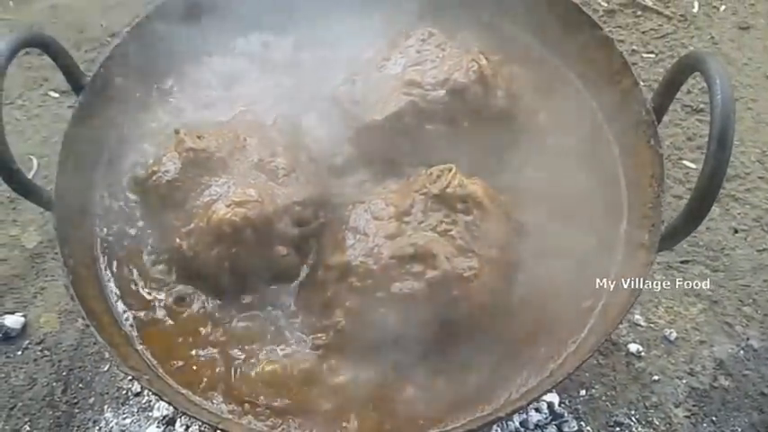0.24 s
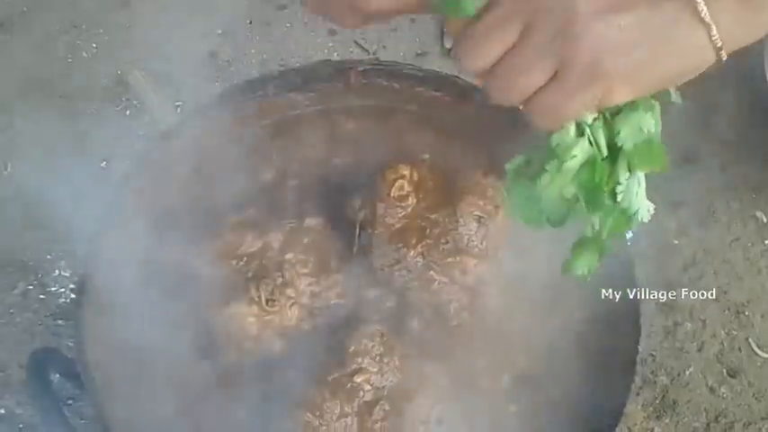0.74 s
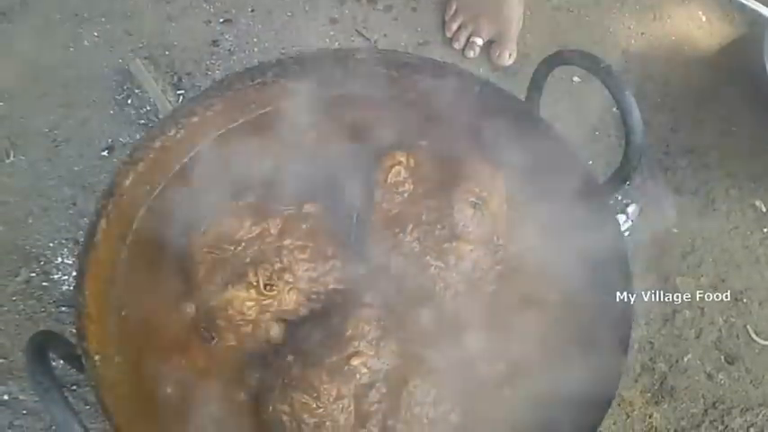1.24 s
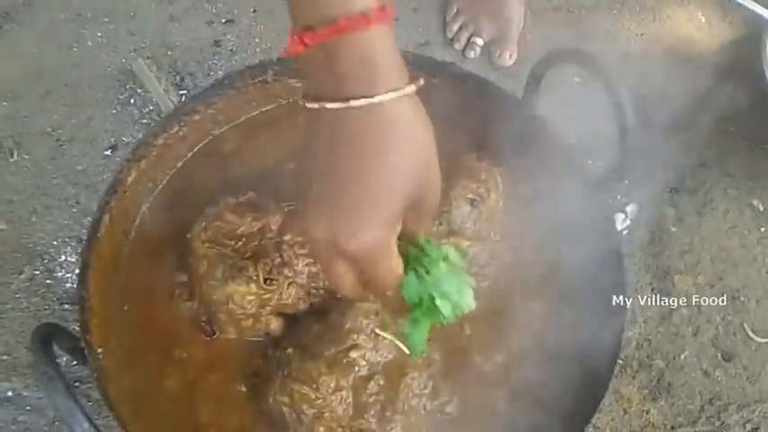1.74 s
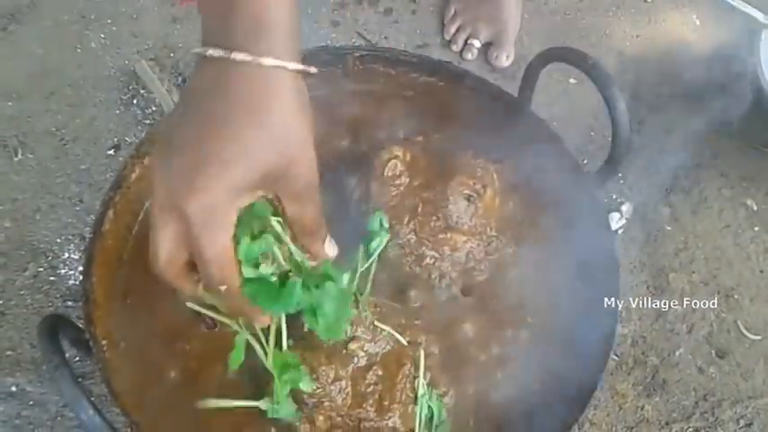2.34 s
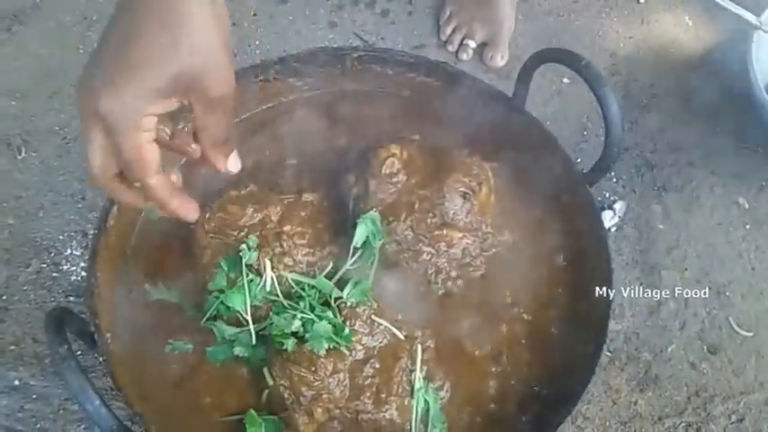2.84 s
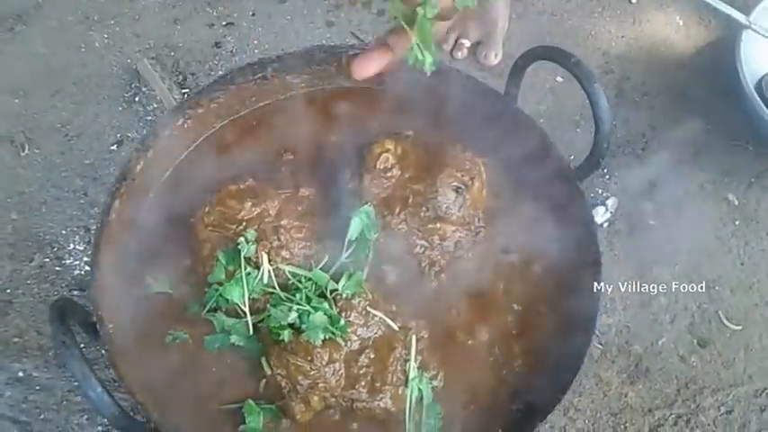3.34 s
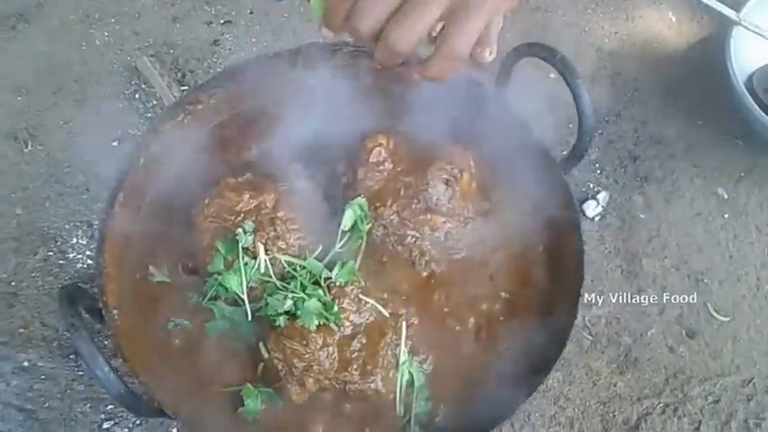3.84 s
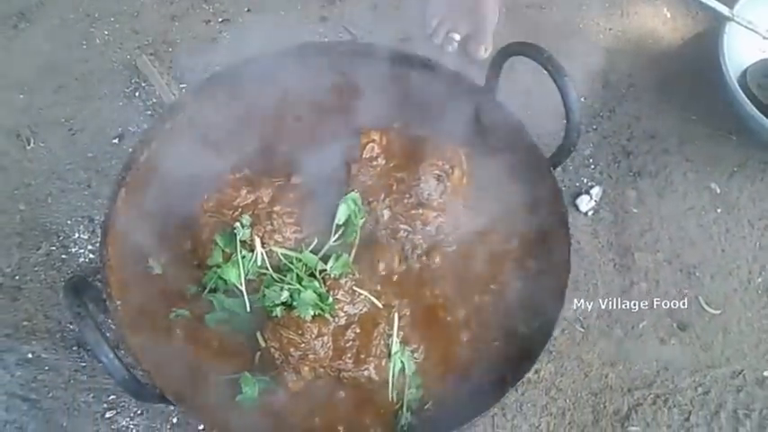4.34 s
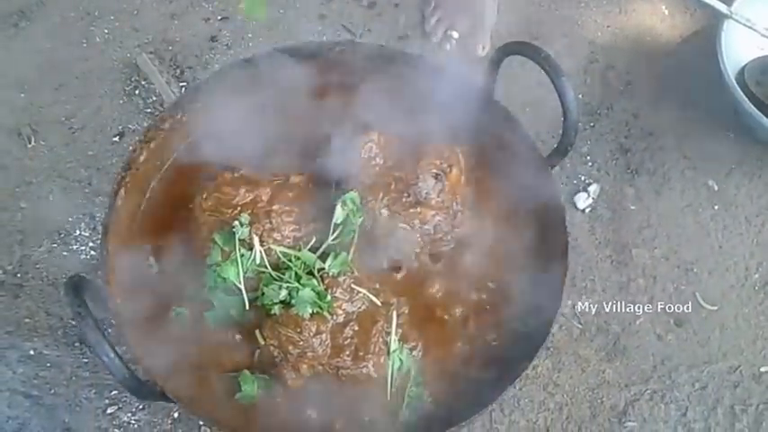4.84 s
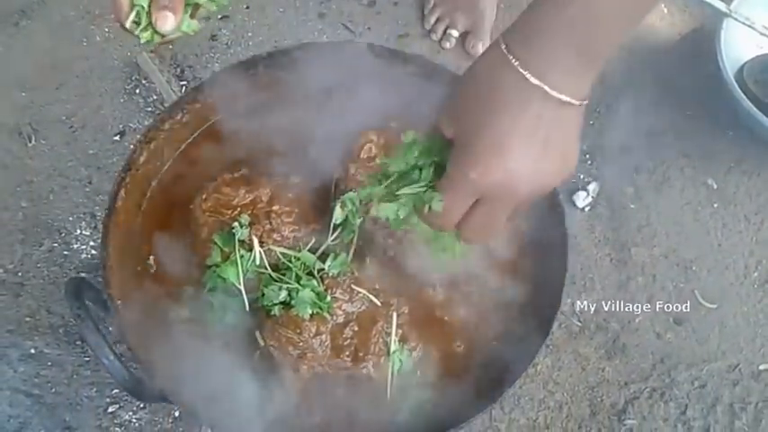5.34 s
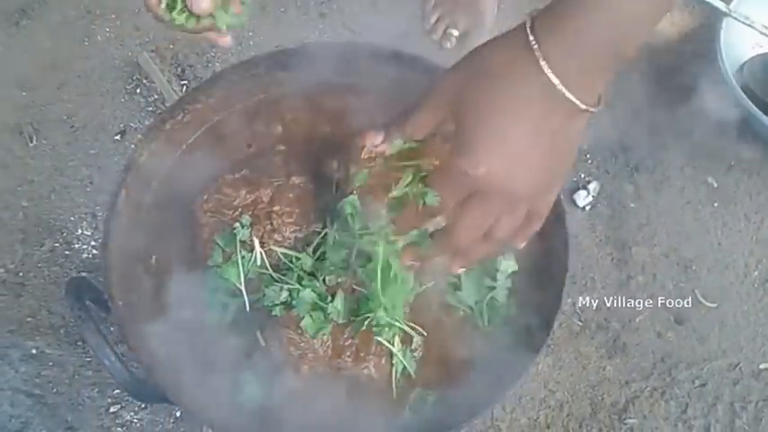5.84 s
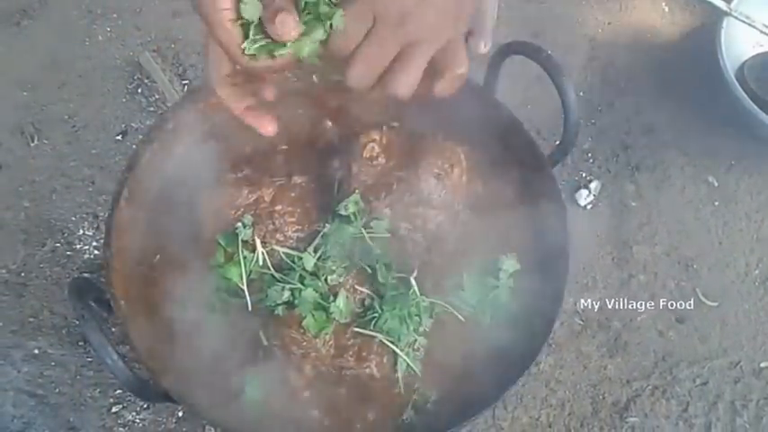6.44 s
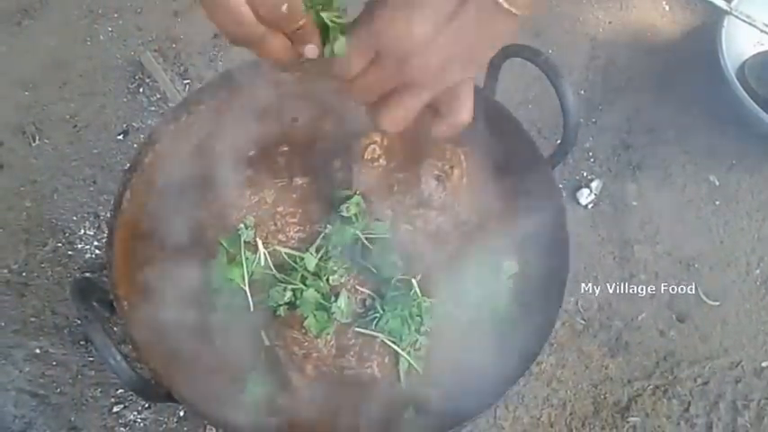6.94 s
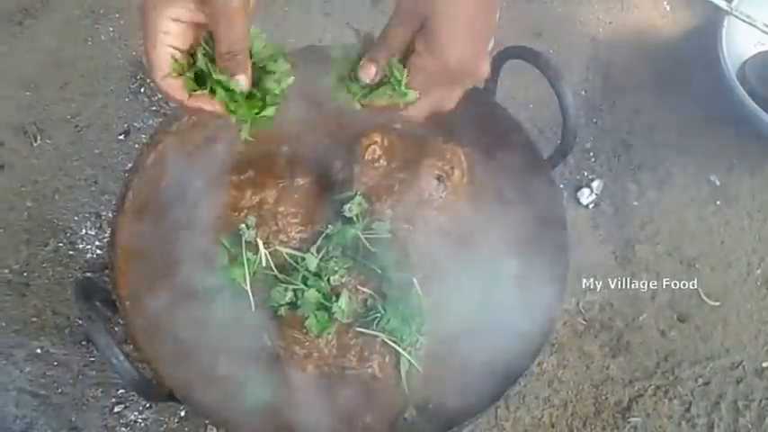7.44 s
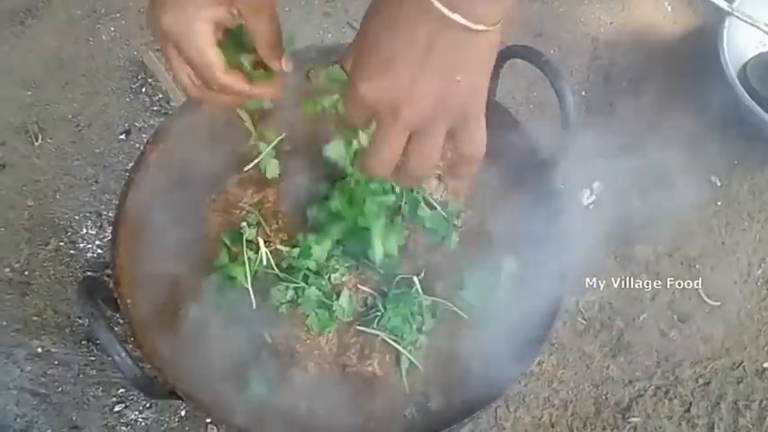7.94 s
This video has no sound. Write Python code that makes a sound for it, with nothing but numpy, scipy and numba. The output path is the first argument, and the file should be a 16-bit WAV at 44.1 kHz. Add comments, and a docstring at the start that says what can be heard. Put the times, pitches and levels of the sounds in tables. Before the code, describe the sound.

Thick gravy boils in a wide metal pan over an outdoor fire, bubbling and spitting with a few louder pops at the start. About a second in, hands tear fresh herbs, with crisp stem snaps and leafy rustling. The tearing returns midway and once more near the end as the boil carries on. The microphone is just above the pan, with a faint fire rumble behind.

```python
"""Thick gravy boils in a wide metal pan over an outdoor fire; a phone is held just above it.
From the start the fire rumbles, an insect hisses in a narrow band, and steam pockets burst as rising
blips and spit fine drops. The boil sizzles, one pocket gurgles, a few thump; then hands tear herbs:
stems snap, leaves rustle. They tear again near 4.7 s, a far bird whistles once at 5.2 s, and a last
pull comes at 7.2 s."""
import sys
import numpy as np
from scipy import signal
from scipy.fft import rfft, irfft
from scipy.io import wavfile
from scipy.ndimage import uniform_filter1d
from numba import njit

SR = 44100
rng = np.random.default_rng(int(sys.argv[2]) if len(sys.argv) > 2 else 0)


def store_wav(level_fs):
    """Save 16-bit WAV to argv[1]."""
    pcm = np.round(np.clip(np.atleast_2d(level_fs), -1, 1) * 32767)
    wavfile.write(sys.argv[1], SR, pcm.T.astype(np.int16))


N = 361158

# background around the pan: (time [s], rumble level [dB], open-air hiss level [dB])
BACKGROUND = [(0.0, -55, -67), (1.07, -56, -63.5), (1.5, -61, -79), (8.19, -65, -75.5)]
# spectra of the rumble, of air and steam, and of rustling: (frequency [Hz], relative density [dB])
RUMBLE_SPECTRUM = [(20, -25), (50, -14), (110, -4.5), (220, -3.5), (420, -7), (1000, -7.5), (2400, -13),
                   (3000, -21)]
HISS_SPECTRUM = [(1500, -36), (3000, 2.5), (4400, 9), (5700, -3.5), (9000, 4), (16000, -8.5)]
RUSTLE_SPECTRUM = [(200, -6), (700, -7.5), (1800, 2.5), (3300, -4.5), (4300, 1), (6000, -2), (9200, 4.5),
                   (14200, 1.5), (16000, -26)]
# bursts of rustling hiss: the boil sizzling at the start, then pulls on the herbs
# (time [s], hold [s], level [dB], gain below 6 kHz [dB])
RUSTLES = [(0.058, 0.22, -59, 12), (.38, 0.051, -60.5, 18.5), (0.602, 0.062, -48, -5.5),
           (0.698, 0.075, -48.5, -4.5), (0.784, 0.08, -46.5, -0.5), (0.885, 0.1, -49, -4),
           (1.058, 0.0068, -43.5, -1), (1.105, 0.011, -43, -18), (1.156, 0.077, -46, -9),
           (3.165, 0.25, -63, 5.5), (4.675, 0.04, -42.5, -4.5), (4.761, 0.075, -48.5, -5.5),
           (5.882, 0.064, -56.5, 6.5), (7.209, 0.056, -50, 4)]
# stems snapping and drops spitting: (time [s], level [dB], pitch [Hz])
CLICKS = [(0.118, -31, 5360), (0.1597, -36, 9200), (0.1902, -33, 8200), (0.293, -36, 13100),
          (0.3034, -34, 4130), (0.4088, -32, 4300), (0.446, -33.5, 8000), (0.604, -25.5, 7800),
          (0.66, -23.5, 9500), (0.697, -22, 7840), (0.71, -28, 9600), (0.723, -24, 7700),
          (0.7477, -29, 6400), (0.784, -27.5, 4120), (0.7932, -29, 4270), (0.801, -25, 4540),
          (0.8188, -22, 7460), (0.8344, -21, 9700), (0.844, -25.5, 9800), (0.849, -24, 9900),
          (.8651, -29, 8600), (.9033, -34.5, 4100), (0.9311, -24, 10800), (0.9585, -23, 12400),
          (1.0046, -33, 8300), (1.0543, -24, 12400), (1.0598, -10.5, 13500), (1.0694, -23, 13500),
          (1.0816, -33, 13500), (1.11, -29, 11400), (1.1168, -21.5, 9900), (1.1516, -16.5, 12500),
          (1.159, -28, 11900), (1.181, -20, 12300), (1.2054, -21, 12300), (1.2172, -24.5, 12300),
          (1.2237, -26, 4660), (1.231, -23, 8700), (1.549, -35.5, 6760), (1.6428, -38, 11700),
          (1.727, -33, 6300), (2.0425, -33, 12300), (2.6, -32, 4160), (2.609, -37, 4360),
          (3.7756, -31, 8500), (3.8286, -36.5, 5130), (4.0687, -37.5, 11100), (4.1706, -35, 9100),
          (4.327, -41, 7700), (4.3814, -38, 12700), (4.411, -34.5, 12400), (4.4825, -29, 13700),
          (4.522, -27, 8900), (4.584, -32.5, 9100), (4.6023, -30.5, 9200), (4.641, -24, 13000),
          (4.6653, -31, 7700), (4.6782, -27, 9100), (4.6876, -19.5, 9100), (4.7075, -19.5, 9400),
          (4.7182, -28, 9500), (4.76, -33, 13600), (4.7751, -30, 12400), (4.785, -24.5, 12300),
          (4.7939, -20, 13500), (4.8, -30, 11900), (4.8159, -26, 12100), (4.8285, -17.5, 12600),
          (4.8769, -35.5, 4600), (5.9176, -35, 4400), (7.1159, -34, 8300), (7.1579, -26, 12900),
          (7.189, -35, 12700), (7.1976, -26, 12900), (7.2126, -30, 7700), (7.2166, -20.5, 13400),
          (7.2313, -23, 12600), (7.25, -21.5, 13000), (7.2582, -29, 13300), (7.285, -35, 3550),
          (7.5, -35, 10300)]
# one deep pocket gurgling, and dull thumps: (time [s], level [dB])
GURGLE_PULSES = [(0.059, -39), (.117, -41), (.14, -40), (0.164, -34), (.181, -33), (0.243, -36)]
LOW_THUMPS = [(0.411, -28), (0.545, -26.5), (0.578, -32)]
# resonances of the air above the gravy: (frequency [Hz], width [Hz], lift [dB])
PAN_RESONANCES = [(395, 59, 6), (1153, 480, 5), (2470, 130, 3.5)]
# the boil, before the pan colours it: (time [s], level [dB])
BOIL_LEVELS = [(0, -47.5), (.3, -45), (.42, -42), (.6, -52.5), (1.05, -44.5), (1.6, -49.5), (3.2, -50.5),
               (4.2, -53.5), (4.7, -49), (5.2, -52), (6.3, -51.5), (6.6, -57), (7.0, -51.5), (8.19, -55)]
# brief lulls in the boil: (time [s], depth [dB])
BOIL_LULLS = [(.34, 34), (2.475, 28), (2.66, 7)]
# the largest bubbles, before the pan colours them: (time [s], level [dB], nominal pitch [Hz])
LARGE_BUBBLES = [(0.408, -22, 1230), (0.468, -11.5, 1540), (0.543, -30.5, 1050), (0.579, -27, 1060),
                 (0.701, -29, 670), (1.058, -27, 2440), (1.131, -34, 1130), (1.253, -30, 1090),
                 (1.684, -33, 1060), (1.736, -30, 1180), (2.252, -29.5, 1930), (2.348, -20.5, 1094),
                 (2.772, -35, 2340), (2.94, -29, 1440), (3.054, -30.5, 2420), (3.212, -29, 1800),
                 (3.758, -30.5, 2330), (3.978, -29, 1130), (4.03, -32, 1610), (4.305, -29.5, 1360),
                 (4.386, -29.5, 1170), (4.476, -25, 1630), (4.917, -33, 1220), (5.393, -33, 2370),
                 (6.451, -28.5, 940), (6.913, -34, 2140), (6.96, -35, 2290), (7.584, -30, 1910),
                 (8.061, -29.5, 2350)]

TOP_HZ = 15050  # upper limit of the phone and of the swarms' starting pitches
TIME = np.arange(N) / SR


def undb(db):
    return 10 ** (np.asarray(db) / 20)


def unit(x):
    return x / np.sqrt(np.mean(x ** 2))


def curve(rows):
    """Columns of a table joined by straight lines in time."""
    times, *columns = np.transpose(rows)
    return [np.interp(TIME, times, column) for column in columns]


def colour(x, spectrum):
    """Filter to a spectrum, at unit RMS."""
    hz, db = np.transpose(spectrum)
    bins = np.maximum(np.arange(N // 2 + 1) * SR / N, 1)
    return unit(irfft(rfft(x) * undb(np.interp(np.log(bins), np.log(hz), db)), N))


def noise(spectrum):
    return colour(rng.standard_normal(N), spectrum)


def walk(rate_hz):
    """Random steps smoothed twice, at unit RMS."""
    hold = int(SR / rate_hz)
    steps = np.repeat(rng.standard_normal(N // hold + 1), hold)
    return unit(uniform_filter1d(uniform_filter1d(steps, hold), hold)[:N])


@njit
def blips(n, start, step, cycles, rise, size):
    """Damped sines that swell within half a cycle; the pitch grows by `rise` each cycle."""
    out = np.zeros(n)
    for e in range(len(start)):
        phase, i = 0., int(start[e])
        while phase < 2 * cycles[e] + 1 and i < n:
            envelope = min(2 * phase, 1.) * np.exp(-2.3 * phase / cycles[e])
            out[i] += size[e] * envelope * np.sin(2 * np.pi * phase)
            phase += min(step[e] * (1 + rise[e] * phase), .45)
            i += 1
    return out


def ring(times, hz, db, cycles, rise=0.):
    """Blips at the given times, each 20 dB down after `cycles`."""
    times, hz, db, cycles, rise = np.broadcast_arrays(times, hz, db, cycles, rise)
    return blips(N, times * SR, hz / SR, np.maximum(cycles, .5), 1. * rise, undb(db))


def swarm(surge_db, count, low_hz, octaves, tilt_db, cycles, spread_db, rise=0.):
    """Random blips whose levels follow the surges; low ones die in fewer cycles."""
    when, size, height, sustain, glide = rng.random((count, 5)).T
    db = surge_db[(when * N).astype(int)] + tilt_db * height - spread_db * np.log(1 - .98 * size)
    hz = np.minimum(low_hz * 2 ** (octaves * height), TOP_HZ)
    ring_cycles = cycles * 2 ** (2 * height + sustain - 1.5)
    return unit(ring(when * N / SR, hz, db, ring_cycles, 2 * rise * glide))


def fire_and_air(surge):
    """Below the microphone the fire and churning pan rumble; the open air hisses all round."""
    rumble_db, hiss_db = curve(BACKGROUND)
    flicker_db = 1.83 * np.clip(walk(16), -2, 1.5)
    rumble = undb(rumble_db + 3.36 * surge + flicker_db) * noise(RUMBLE_SPECTRUM)
    hiss = undb(hiss_db + .83 * walk(26)) * noise(HISS_SPECTRUM)
    return rumble + hiss


def insect(hz=10750, width_hz=260, db=-78):
    """A faint insect hisses in one narrow band, wavering in level."""
    band = signal.iirpeak(hz, hz / width_hz, fs=SR)
    return undb(db + walk(8)) * unit(signal.lfilter(*band, rng.standard_normal(N)))


def bird(start_s=5.205, length_s=.19, start_hz=5350, rest_hz=2050, fall_s=.092, db=-71):
    """Far off, one unsteady whistle sinks towards its rest pitch."""
    since = np.clip(TIME - start_s, 0, length_s)
    swell = np.abs(np.sin(np.pi * since / length_s)) ** .3
    gain = undb(db + 1.8 * walk(190)) * swell
    hz = rest_hz + (start_hz - rest_hz) * np.exp(-since / fall_s)
    hz *= 1 + .035 * walk(370)
    return gain * np.sqrt(2) * np.sin(2 * np.pi * np.cumsum(hz) / SR)


def fibres(decay_s=.0013):
    """Breaking fibres: tiny noise bursts, most weak and a few strong."""
    when, size = rng.random((N // 100, 2)).T
    kicks = np.zeros(N)
    kicks[(when * N).astype(int)] = (1 - .99 * size) ** -.42
    envelope = signal.lfilter([1], [1, -np.exp(-1 / (decay_s * SR))], kicks)
    return colour(envelope * rng.standard_normal(N), RUSTLE_SPECTRUM)


def sizzle_and_herbs(rise_db_per_s=909, fall_db_per_s=484, tear_db=-54, split_hz=6000):
    """Bursts of flickering hiss: first the boil sizzles, then leaves rub and their fibres crackle."""
    gain, low_gain = np.zeros(N), np.zeros(N)
    for start, hold, db, low_db in RUSTLES:
        before, after = np.maximum(start - TIME, 0), np.maximum(TIME - start - hold, 0)
        burst = undb(db - rise_db_per_s * before - fall_db_per_s * after)
        gain += burst
        low_gain += burst * undb(low_db)
    breaks = fibres()
    flicker = np.clip(walk(70), -2, 1.5)
    ticks = swarm(2 * flicker, count=4000, low_hz=3400, octaves=2.15, tilt_db=-16, cycles=13,
                  spread_db=1)
    crackle = undb(2 * flicker) * breaks + undb(-3) * ticks
    # soft bursts mostly swish; fibres break under a hard pull
    tearing = gain ** 2 / (gain ** 2 + undb(2 * tear_db))
    swish = undb(-3 + 3.4 * tearing * flicker) * noise(RUSTLE_SPECTRUM)
    rustle = tearing * undb(1.5) * crackle + swish
    low = signal.sosfiltfilt(signal.butter(2, split_hz, fs=SR, output="sos"), rustle)
    return gain * (rustle - low) + low_gain * low


def snaps(tail_ms=1.1):
    """A stem snaps or a drop spits: a click with a short tail of noise."""
    times, db, hz = np.transpose(CLICKS)
    kicks = np.zeros(N)
    kicks[(times * SR).astype(int)] = undb(db - 8)
    ms = np.arange(0, .015, 1 / SR) * 1000
    tail = np.minimum(5 * ms, 1) * np.exp(-ms / tail_ms)
    bursts = signal.fftconvolve(kicks, tail)[:N] * noise(RUSTLE_SPECTRUM)
    return ring(times, hz, db, cycles=11) + bursts


def gurgle():
    """A deep pocket rings on one pitch without opening."""
    times, db = np.transpose(GURGLE_PULSES)
    return ring(times, hz=524, db=db, cycles=9.2)


def thumps():
    """Some pockets give a dull thump of barely one cycle."""
    times, db = np.transpose(LOW_THUMPS)
    return ring(times, hz=142, db=db, cycles=.61)


def surges():
    """Steam comes up in surges; the fire is steady, so they even out within an eighth of a second."""
    surge = walk(45) + .7 * walk(22)
    return np.clip(surge - uniform_filter1d(surge, SR // 8), -2.5, 1.5)


def pan(boil, off_resonance_db=-8):
    """The air in the pan resonates above the gravy."""
    hz = np.arange(N // 2 + 1) * SR / N
    lift_db = sum(db / (1 + (2 * (hz - centre) / width) ** 2) for centre, width, db in PAN_RESONANCES)
    return irfft(rfft(boil) * undb(lift_db + off_resonance_db), N)


def large_bubbles(ring_s=.0048):
    """The skin cracks as it tears, and the opening pocket rings upward."""
    times, db, hz = np.transpose(LARGE_BUBBLES)
    pocket = ring(times, .9 * hz, db - .5, cycles=ring_s * hz, rise=.045)
    crack = ring(times, 1.62 * hz, db - 1, cycles=5.4)
    return pocket + crack


def gravy(surge, lull_half_width_s=.025):
    """Just under the microphone small pockets burst, rising in pitch, with drops and steam."""
    lull_db = sum(db * np.exp(-((TIME - at) / lull_half_width_s) ** 2) for at, db in BOIL_LULLS)
    boil_db = curve(BOIL_LEVELS)[0] - lull_db
    pockets = swarm(2 * surge, count=3900, low_hz=380, octaves=2.65, tilt_db=-1, cycles=4.5,
                    spread_db=3.7, rise=.03)
    drops = swarm(2 * surge, count=1500, low_hz=2000, octaves=2.7, tilt_db=3, cycles=2.6, spread_db=3.6)
    steam = undb(1.7 * surge) * noise(HISS_SPECTRUM)
    return undb(boil_db) * (pockets + undb(-9) * drops + undb(-12.5) * steam)


def scene():
    """One microphone above the pan: boil and hands close, the outdoors behind."""
    surge = surges()
    low_cut = signal.butter(2, 150, "high", fs=SR, output="sos")
    crackle = signal.sosfilt(low_cut, snaps() + sizzle_and_herbs())
    boil = pan(gravy(surge) + large_bubbles()) + gurgle() + thumps()
    outdoors = fire_and_air(surge) + insect() + bird()
    return (outdoors + crackle + boil)[None]


def record(dry):
    """The phone cuts the top treble steeply."""
    return signal.sosfilt(signal.ellip(10, .2, 70, TOP_HZ, fs=SR, output="sos"), dry)


dry = scene()
out = record(dry)
store_wav(out)
```